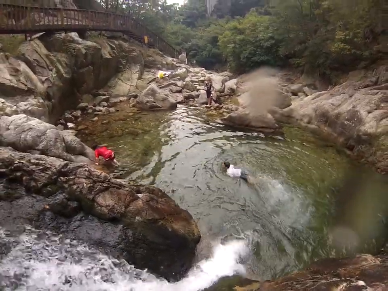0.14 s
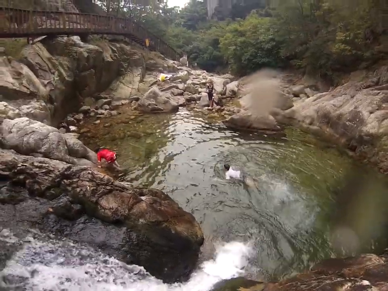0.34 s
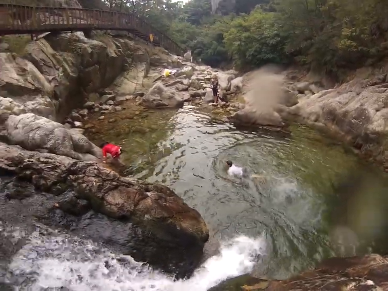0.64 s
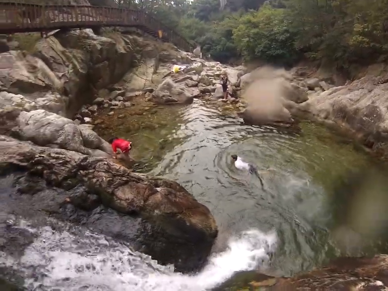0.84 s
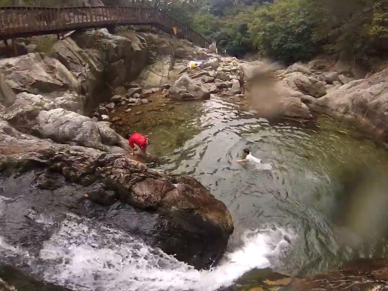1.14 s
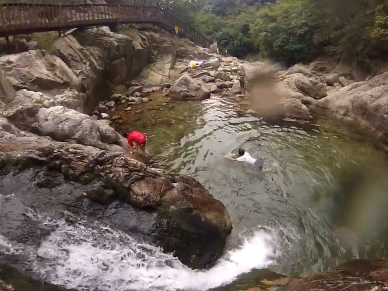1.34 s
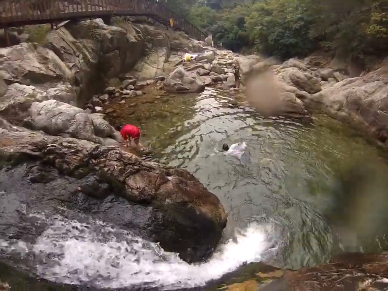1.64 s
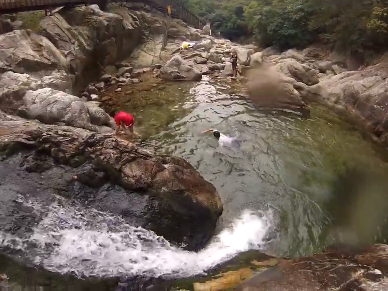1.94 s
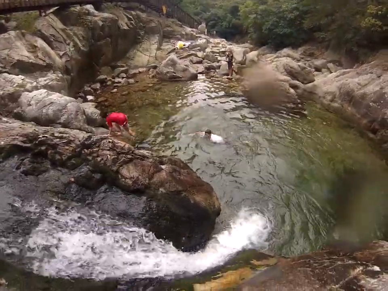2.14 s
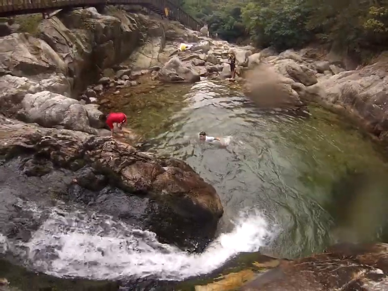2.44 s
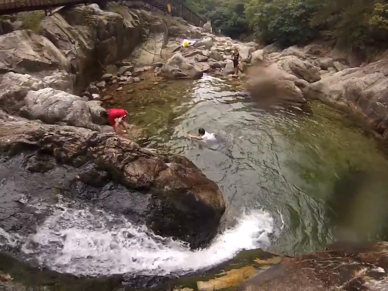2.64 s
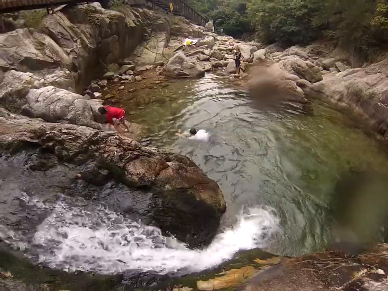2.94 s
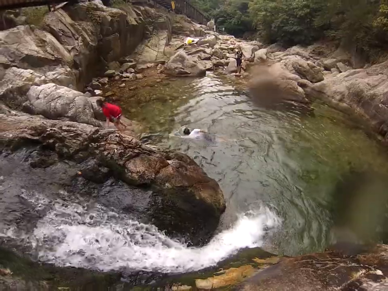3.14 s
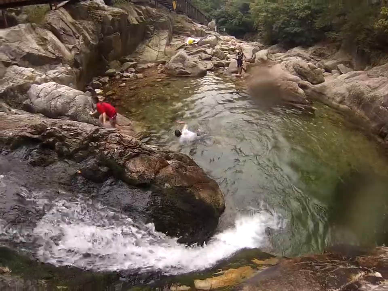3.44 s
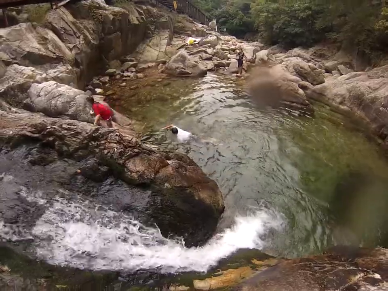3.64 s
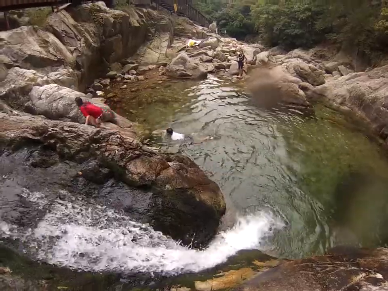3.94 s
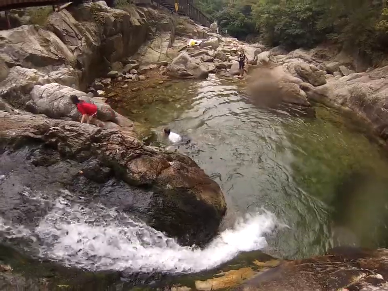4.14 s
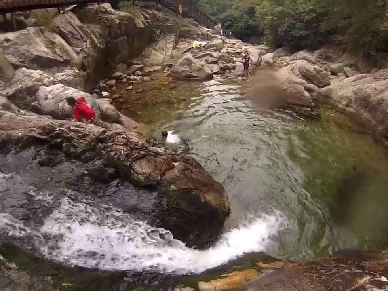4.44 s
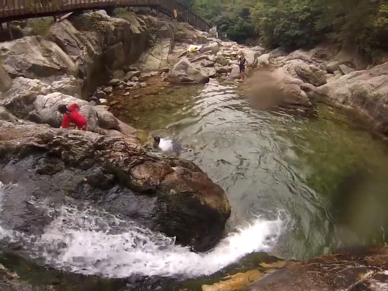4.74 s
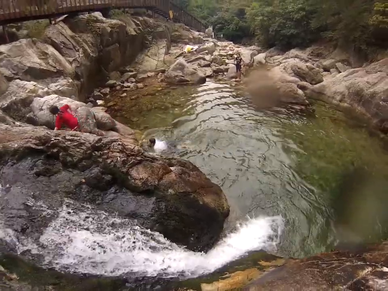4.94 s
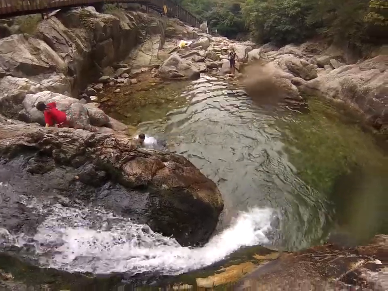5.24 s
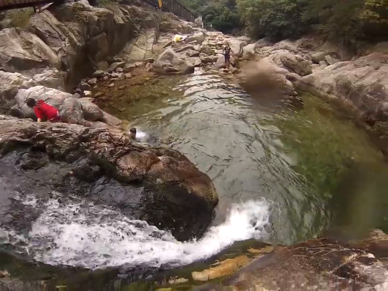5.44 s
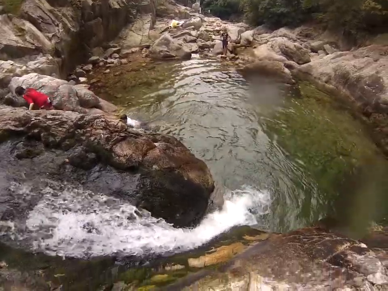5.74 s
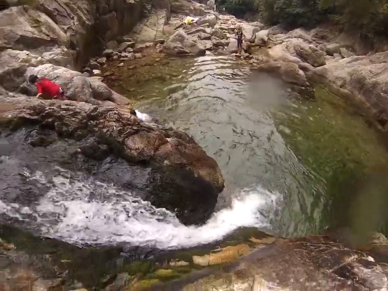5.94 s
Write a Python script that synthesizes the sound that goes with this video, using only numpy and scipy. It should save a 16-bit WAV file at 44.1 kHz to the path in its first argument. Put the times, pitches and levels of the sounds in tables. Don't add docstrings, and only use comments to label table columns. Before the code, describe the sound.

A small cascade pours steadily into a rock pool, muffled by a plastic housing, with low handling rumble and a late burst of knocks.

```python
import sys
import numpy as np
from scipy import signal
from scipy.io import wavfile
from scipy.ndimage import uniform_filter1d

SR = 44100
rng = np.random.default_rng(int(sys.argv[2]) if len(sys.argv) > 2 else 0)


def amplitude_ratio(level_db):
    exponent = np.asarray(level_db, float) / 20
    return 10 ** exponent


def store_pcm(level_fs):
    pcm = np.round(np.clip(level_fs, -1, 1) * 32767).astype(np.int16)
    wavfile.write(sys.argv[1], SR, np.atleast_2d(pcm).T)


N = 268304

# t/s, water level/dB, spray brightness/dB
POUR_CURVE = [
    (0.0, -49.7, -0.8),
    (2.08, -49.5, 0),
    (5.2, -49, 0),
    (6.08, -48, -0.5),
]
# f/Hz, density level/dB
WATER_SPECTRUM = [(120, -9), (300, -9), (450, -12), (900, -8), (1800, -8.5), (3000, -15), (5500, -18),
                  (7500, -17), (9300, -27.5), (11500, -23), (12600, -34.5), (13800, -29), (15800, -42)]
# f/Hz, width/Hz, gain/dB
HOUSING_MODES = [(1085, 90, 4), (1175, 60, -3), (1290, 350, 8), (1850, 300, -3), (2290, 330, 13),
                 (2600, 150, 3), (3570, 120, 2), (4440, 140, 4), (5900, 200, 2), (6170, 260, -6),
                 (6650, 500, 2), (7150, 300, -2.5), (7650, 400, 2), (9900, 700, 2), (10650, 500, -3),
                 (11400, 800, 2), (12700, 600, -1.5), (13250, 500, 1.5)]
# t/s, sway level/dB
HAND_UNREST = [(0.0, -31), (0.16, -39), (0.4, -32.5), (0.7, -31), (0.84, -45), (1.0, -32), (1.25, -39),
               (1.4, -29.5), (1.58, -38.5), (1.8, -32.5), (2.24, -37.5), (2.6, -39.5), (3.65, -45.5),
               (3.9, -36), (5.0, -39), (5.22, -26.5), (5.39, -41), (5.5, -22)]
# t/s, peak level/dB, direction/+-1, edge level/dB
MOUNT_JOLTS = [(.003, -28.5, -1, -32), (.195, -40, -1, -27), (.378, -32.5, -1, -8), (0.404, -27.5, -1, -34),
               (.428, -43, 1, -20), (.571, -29.5, 1, -12.5), (.645, -38, -1, -30), (.735, -42.5, 1, -24),
               (.96, -39, 1, -14), (1.045, -34, 1, -20), (1.11, -41, -1, -23), (1.395, -37.5, -1, -33),
               (1.452, -27.5, 1, -14.5), (1.535, -41, 1, -25), (1.62, -39, 1, -17.5),
               (1.765, -35.5, 1, -14), (1.822, -29.5, 1, -19), (1.934, -33, 1, -14), (2.11, -42, 1, -27),
               (2.17, -38.5, -1, -20), (4.338, -36, 1, -15), (4.63, -42, 1, -15)]
# t/s, peak level/dB, ring f/Hz, direction/+-1, edge level/dB
GRIP_KNOCKS = [(5.102, -21, 35, -1, -20), (5.1123, -18.5, 60, -1, -3), (5.146, -20.5, 41, -1, -30),
               (5.170, -22, 61, 1, -26), (5.181, -13, 54.5, -1, -14), (5.1916, -17.5, 47, 1, -6.5),
               (5.403, -16.5, 27.7, -1, -16), (5.425, -33, 39, 1, -22), (5.4665, -22, 158, 1, -25),
               (5.470, -9.5, 66, 1, -10), (5.52, -26, 59, 1, -27), (5.635, -26, 48, 1, -17),
               (5.672, -23, 32, 1, -30), (5.722, -17, 42, -1, -21), (5.78, -23, 19.6, 1, -39),
               (5.84, -21.5, 26, 1, -38), (5.9, -14.5, 19, 1, -20), (5.945, -27, 59, -1, -3.5),
               (5.992, -33.5, 350, 1, 0), (6.012, -21, 15.8, 1, -30), (6.0, -21.5, 49, -1, -24),
               (6.06, -31, 49, -1, -24)]
# t/s, peak level/dB, dull body level/dB, bright edge level/dB, rattle decay/s
SHELL_TICKS = [(5.1025, -36, 0, -12, .001), (5.1130, -25, -6, -9, .0012), (5.1705, -26, -12, -20, .004),
               (5.1798, -22, -16, -14, .0012), (5.1850, -24, -10, -8, .002), (5.1900, -24, -14, -14, .0015),
               (5.1917, -12, -16, -14, .0012), (5.1955, -28, -2, -1, .003), (5.278, -37, -8, -14, .002),
               (5.4028, -24, -4, -15, .0016), (5.4664, -20, -1, -10, .002), (5.4714, -20, -3, -4, .0015),
               (5.493, -38, -6, -14, .002), (5.686, -37, -6, -14, .003), (5.8868, -35, -6, 8, .0001),
               (5.9935, -21, 4, -14, .0017)]

TREBLE_END_HZ = 15250
SHAKE_UNDER_DB, SHAKE_FOLLOWS, CALM_DB = -16, 0.86, -34.5
LIGHT_JOLT_DB, LIGHT_HZ, SAG_HZ_PER_DB = -40, 65, 1.26
LIGHT_T60_S, LONGER_S_PER_DB = 0.096, 0.003
KNOCK_CYCLES = 4.5
SLIP_END_S, SLIP_DB, SLIP_RISE_DB_PER_S, SLIP_STOP_S = 5.19, -36.5, 333, 0.012
CREEP_DB, CREEP_RISE_DB_PER_S, CREEP_TOP_DB = -58, 5.5, -19


def rms_one(x):
    return x / np.sqrt(np.mean(x ** 2) + 1e-20)


def in_time(rows):
    t_s, *columns = np.transpose(rows)
    return [np.interp(np.arange(N) / SR, t_s, c) for c in columns]


def band(x, low_hz, high_hz, order=2):
    sos = signal.butter(order, [low_hz, min(high_hz, SR / 2.2)], "band", fs=SR, output="sos")
    return signal.sosfilt(sos, x)


def drift(rate_hz):
    pole = np.exp(-80 * np.pi * rate_hz / SR)
    noise = rng.standard_normal(N // 40 + 2002)
    slow = signal.lfilter([1], [1, -2 * pole, pole * pole], noise)[2000:]
    return np.interp(np.arange(N) / 40, np.arange(len(slow)), rms_one(slow))


def grains(per_s, spread_db):
    sizes = amplitude_ratio(spread_db * np.minimum(rng.exponential(1, N), 5))
    signs = rng.choice([-1, 1], N)
    return rms_one(sizes * signs * (rng.random(N) < per_s / SR))


def steadied(x, span_s):
    return x / np.sqrt(uniform_filter1d(x ** 2, round(span_s * SR)) + 1e-20)


def housing(x):
    sections = []
    for hz, width_hz, gain_db in HOUSING_MODES:
        g = amplitude_ratio(gain_db / 2)
        a = np.tan(np.pi * width_hz / SR)
        c = -2 * np.cos(2 * np.pi * hz / SR)
        sections.append(np.array([1 + a * g, c, 1 - a * g, 1 + a / g, c, 1 - a / g]) / (1 + a / g))
    return signal.sosfilt(sections, x + 1e-18)


def cascade(drops_db=-6, patchy_db=0.71, surge_db=-0.62):
    water_db, spray_db = in_time(POUR_CURVE)
    surge = drift(14.0)
    sources = [rng.standard_normal(N) + amplitude_ratio(drops_db) * grains(4000, spread_db=2.5) for _ in range(2)]
    hz_points, db_points = np.transpose(WATER_SPECTRUM)
    edges_hz = 100 * 2 ** (np.arange(38) / 5)
    water = 0
    for k, (low_hz, high_hz) in enumerate(zip(edges_hz, edges_hz[1:])):
        centre = np.log(np.sqrt(low_hz * high_hz))
        tilt = np.clip((centre - np.log(3000)) / np.log(4), -1, 1)
        gain_db = np.interp(centre, np.log(hz_points), db_points) + tilt * spray_db
        gain_db = gain_db + surge_db * surge + patchy_db * drift(25)
        water = water + amplitude_ratio(gain_db) * band(sources[k % 2], low_hz, high_hz)
    return amplitude_ratio(water_db + 1.0) * rms_one(housing(water))


def hand(lumpy_db=0.5, skirt_db=-5, waver_db=1.4):
    sway_db, = in_time(HAND_UNREST)
    shake_db = CALM_DB + SHAKE_UNDER_DB + SHAKE_FOLLOWS * (sway_db - CALM_DB)
    tremor, skirt, shake = rng.standard_normal((3, N + SR))
    tremor = steadied(band(tremor, 9.05, 11.01)[SR:], 0.178)
    skirt = steadied(band(skirt, 11.25, 22.7, order=3)[SR:], 0.178)
    sway = (tremor + amplitude_ratio(skirt_db) * skirt) * amplitude_ratio(waver_db * drift(3.8))
    shake = steadied(band(shake, 23.8, 67.5, order=3)[SR:], 0.077) * amplitude_ratio(lumpy_db * drift(24))
    return amplitude_ratio(sway_db) * rms_one(sway) + amplitude_ratio(shake_db) * rms_one(shake)


def rub():
    slips = band(band(grains(12000, spread_db=2.5), 1900, 4200), 900, 9000)
    since_s = np.arange(N) / SR - SLIP_END_S
    creep_db = CREEP_DB + CREEP_RISE_DB_PER_S * since_s
    swell_db = SLIP_DB + SLIP_RISE_DB_PER_S * since_s
    stop_db = np.interp(since_s, [0, SLIP_STOP_S], [SLIP_DB, CREEP_DB])
    level_db = np.where(since_s < 0, swell_db, np.maximum(stop_db, creep_db))
    hiss = rms_one(band(grains(12000, spread_db=5.0), 6700, 14000))
    return amplitude_ratio(level_db) * rms_one(housing(slips)) + (since_s > 0) * amplitude_ratio(creep_db + CREEP_TOP_DB) * hiss


def ticks():
    out, t = np.zeros(N + SR), np.arange(SR // 40) / SR
    noise = rng.standard_normal((len(SHELL_TICKS), len(t)))
    for (t_s, peak_db, body_db, edge_db, decay_s), rattle in zip(SHELL_TICKS, noise):
        rattle = (rattle + 4 * (t == 0)) * np.exp(-t / decay_s)
        shell = band(rattle, 2100.0, 2810.0)
        body = band(rattle, 900.0, 1490.0)
        edge = band(band(rattle, 2900, 6000), 2000, 8200) - amplitude_ratio(-24) * band(rattle, 10000, 15000)
        burst = rms_one(shell) + amplitude_ratio(body_db) * rms_one(body) + amplitude_ratio(edge_db) * rms_one(edge)
        out[round(t_s * SR):][:len(t)] += amplitude_ratio(peak_db) * burst / np.abs(burst).max()
    return out[:N]


def thuds(events, contact_s, edge_hz, edge_t60_s):
    out, t = np.zeros(N + SR), np.arange(SR // 2) / SR
    edge = np.sin(2 * np.pi * edge_hz * t) * amplitude_ratio(-60 * t / edge_t60_s)
    for t_s, peak_db, hz, t60_s, way, edge_db in events:
        ring = np.sin(2 * np.pi * hz * t) * amplitude_ratio(-60 * t / t60_s) * (1 - np.exp(-t / contact_s))
        thud = ring / np.abs(ring).max() + amplitude_ratio(edge_db) * edge
        out[round(t_s * SR):][:len(t)] += np.sign(way) * amplitude_ratio(peak_db) * thud
    return out[:N]


def jolts():
    events = []
    for t_s, peak_db, way, edge_db in MOUNT_JOLTS:
        over_db = peak_db - LIGHT_JOLT_DB
        hz = LIGHT_HZ - SAG_HZ_PER_DB * over_db
        t60_s = LIGHT_T60_S + LONGER_S_PER_DB * over_db
        events.append((t_s, peak_db, hz, t60_s, way, edge_db))
    return thuds(events, contact_s=0.00086, edge_hz=300, edge_t60_s=0.033)


def knocks():
    events = [(t_s, peak_db, hz, KNOCK_CYCLES / hz, way, edge_db)
              for t_s, peak_db, hz, way, edge_db in GRIP_KNOCKS]
    return thuds(events, contact_s=0.0012, edge_hz=160, edge_t60_s=0.02)


def scene():
    water = cascade()
    handling = hand() + rub() + ticks() + jolts() + knocks()
    return (water + handling)[None]


def band_limit(x):
    return signal.sosfilt(signal.butter(12, 15280, fs=SR, output="sos"), x)


def record(dry):
    low_pass = signal.ellip(12, .2, 60, TREBLE_END_HZ, fs=SR, output="sos")
    mix = signal.sosfilt(low_pass, dry)
    return band_limit(mix)


dry = scene()
out = record(dry)
store_pcm(out)
```